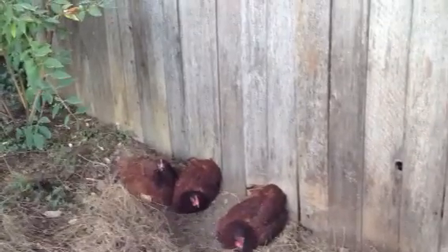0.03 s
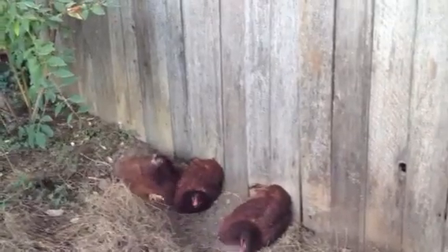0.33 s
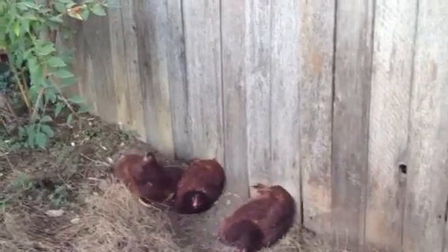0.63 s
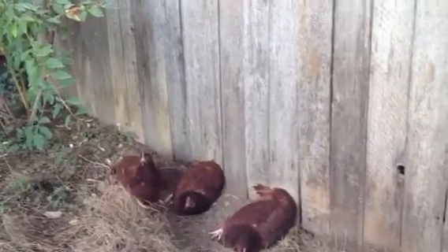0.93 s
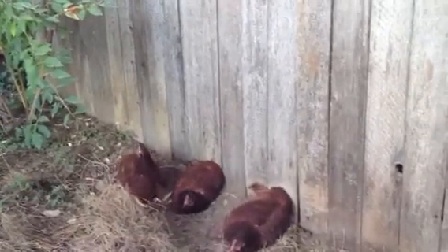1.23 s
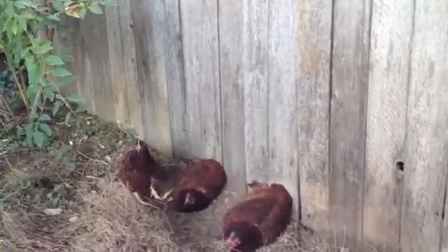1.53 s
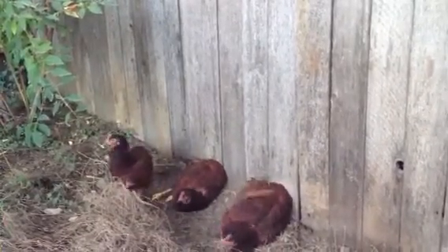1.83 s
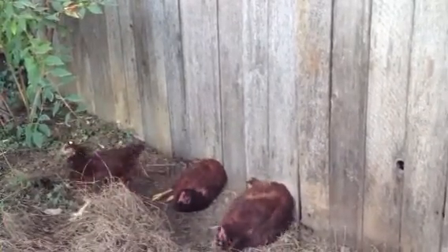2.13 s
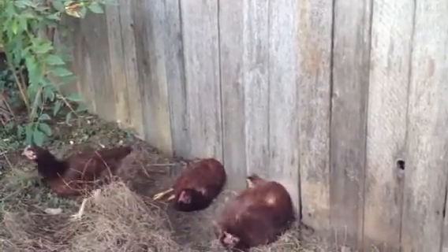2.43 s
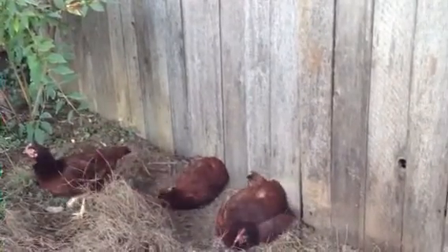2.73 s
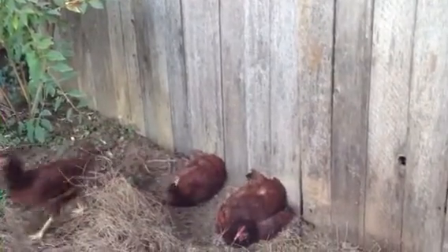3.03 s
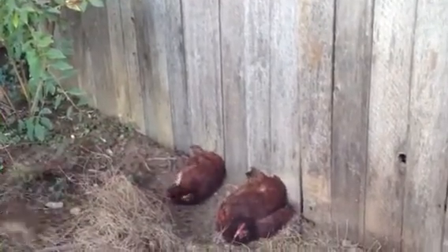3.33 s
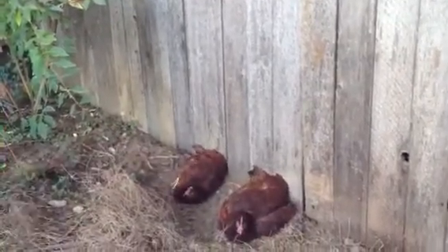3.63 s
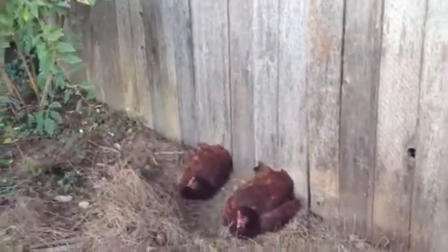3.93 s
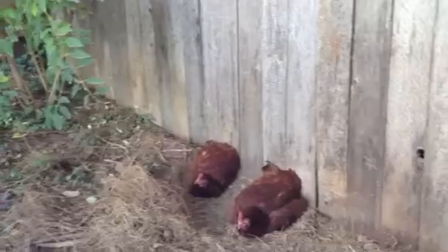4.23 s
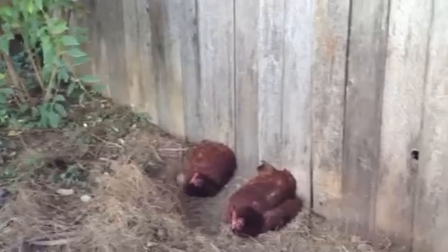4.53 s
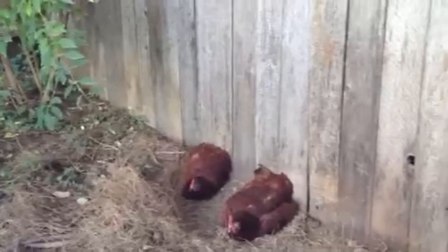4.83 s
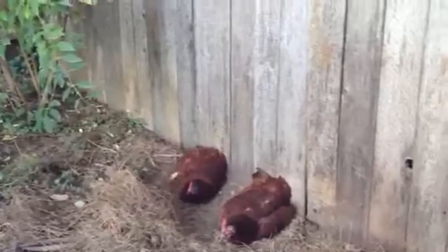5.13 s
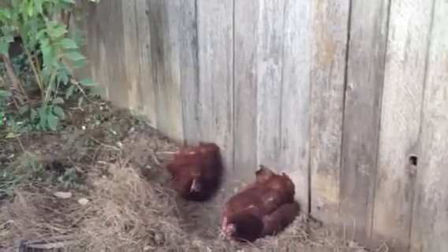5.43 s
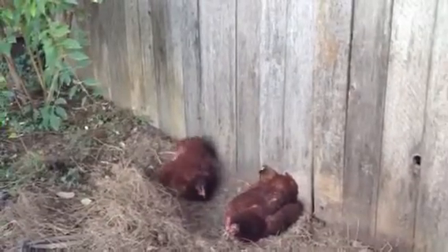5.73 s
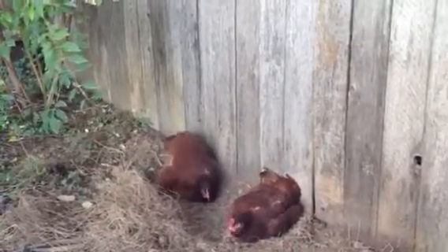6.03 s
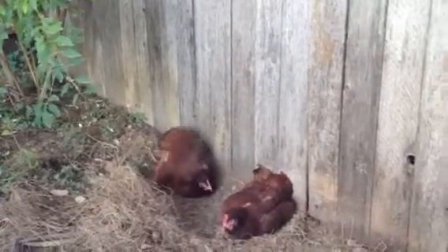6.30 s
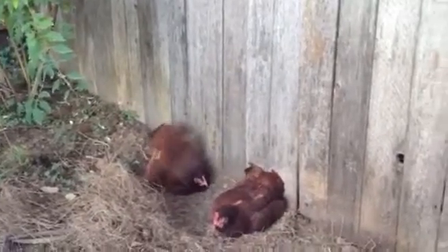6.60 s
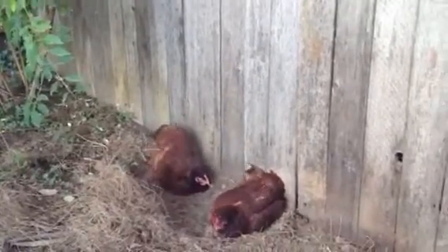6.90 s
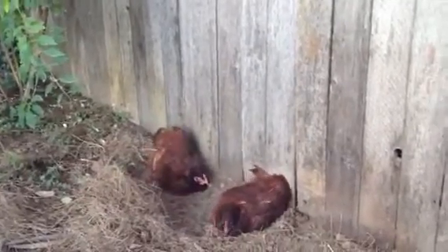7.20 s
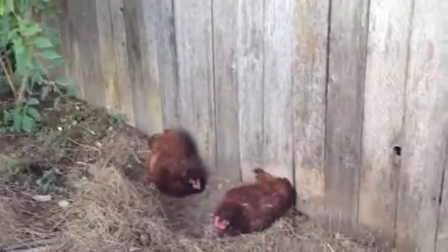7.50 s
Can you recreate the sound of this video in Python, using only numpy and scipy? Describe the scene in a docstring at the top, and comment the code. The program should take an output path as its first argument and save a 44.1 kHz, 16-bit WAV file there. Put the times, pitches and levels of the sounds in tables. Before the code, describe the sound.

Crisp, hissing scrapes on the microphone stand out over soft hen clucks and light straw scratching in a quiet yard.

```python
"""Hens cluck and croon softly as they dust-bathe by a plank fence; one walks off through the straw.
Each call is a harmonic source shaped by throat and chest resonances. Feet and wings crush straw and
earth in clusters of tiny impacts, and the fence returns a short echo. Something dry brushes the
microphone casing: stick-slip friction gives light crackles, snaps and two hard sweeps that ring its
cavities. Behind the hush of the quiet yard a far engine drones faintly."""
import sys
import numpy as np
from scipy import signal
from scipy.fft import rfft, irfft
from scipy.io import wavfile
from scipy.ndimage import uniform_filter1d

SR = 44100
rng = np.random.default_rng(int(sys.argv[2]) if len(sys.argv) > 2 else 0)


def bounce(signal):
    """Save signal as a 16-bit WAV file at the path given by the first command-line argument."""
    frames = np.transpose(np.atleast_2d(signal))
    limited = np.clip(frames, -1, 1)
    pcm = np.round(limited * 32767).astype(np.int16)
    wavfile.write(sys.argv[1], SR, pcm)


N = 333396
TIME = np.arange(N) / SR

# Levels are nominal, before filters and gains; a share is relative to the level in its row.
# (time [s], length [s], level [dB], start pitch [Hz], end pitch [Hz], throat [Hz], chest share [dB])
CLUCK_NOTES = [(-.008, .034, -48, 260, 302, 996, -5.5), (.022, .025, -49.5, 316, 328, 980, -1.5),
               (.196, .019, -48.5, 282, 276, 900, -2), (.212, .021, -45.5, 288, 252, 960, -12),
               (3.374, .017, -43.5, 428, 400, 420, -4), (3.391, .014, -52, 405, 385, 420, -10),
               (3.439, .046, -55.5, 406, 390, 417, -10), (5.857, .01, -48, 380, 372, 750, -20),
               (5.874, .023, -34.5, 478, 406, 930, -15), (5.894, .014, -41.5, 388, 346, 720, -24),
               (5.914, .021, -41, 370, 336, 700, -36)]
# (time [s], length [s], level [dB], start pitch [Hz], end pitch [Hz], throat [Hz])
CROON_NOTES = [(.3, .085, -58, 256, 256, 570), (6.735, .067, -58.5, 260, 270, 630),
               (6.931, .06, -54, 268, 266, 583), (7.014, .13, -55, 238, 244, 546),
               (7.246, .11, -55, 224, 262, 530), (7.293, .085, -54, 258, 224, 700),
               (7.43, .125, -55.5, 214, 240, 520)]
HUSH_SPECTRUM = [(30, -32.5), (60, -24), (95, -15), (125, -4.5), (170, -2.5), (240, -5), (330, -3),
                 (680, -5), (1030, -6.5), (1500, -12.5), (2310, -18), (4650, -25), (9640, -24.5),
                 (15000, -22.5)]  # outdoor background (frequency [Hz], relative gain [dB])
HUSH_LEVELS = [(0.0, -60), (0.69, -59), (1.29, -61), (1.83, -59), (2.43, -60), (3.25, -59), (3.86, -56),
               (4.96, -60), (5.9, -59), (6.05, -58), (6.7, -58)]  # its slow course (time [s], level [dB])
ENGINE_HUM = [(0.0, 78.8, -87), (0.34, 74.3, -91), (0.48, 59.2, -80), (1.43, 61.1, -84), (1.52, 54.5, -82),
              (3.26, 75.4, -72), (5.16, 74.3, -81), (5.73, 66.3, -76), (7.56, 72.7, -77)]  # deep tone (time [s], frequency [Hz], level [dB])
ENGINE_TONES = [(527.6, -72.5), (656.8, -74), (1061, -80.5)]  # higher tones (frequency [Hz], level [dB])
LIGHT_TOUCHES = [(.06, .18, -62), (.305, .05, -62.5), (.48, .18, -63.5), (.72, .2, -71), (2.76, .13, -62),
                 (2.91, .33, -59), (3.6, .23, -58)]  # brushing on the casing (time [s], hold [s], level [dB])
# friction spectra: bright casing, duller scrape, fine and coarse hiss (frequency [Hz], relative gain [dB])
CASING_SPECTRUM = [(1500, -70), (4200, -13.5), (6900, -17.5), (7800, 2.5), (8800, -1), (10000, 0),
                   (11300, 2.5), (12200, 3.5), (13000, 0), (15300, -2)]
SCRAPE_SPECTRUM = [(200, -33), (800, -10.5), (1500, -3), (2500, 0.5), (4000, 4), (4700, 3.5), (6000, 6.5),
                   (7200, 8.5), (9500, 6.5), (15000, -6)]
FINE_SPECTRUM = [(1500, -55), (3000, -42), (7000, -35), (9500, -18), (11100, -2), (12200, -0.5),
                 (13200, -4), (15100, -6)]
COARSE_SPECTRUM = [(1500, -45), (3000, -32), (6900, -23), (7800, 1.5), (8700, -1.5), (10000, -0.5),
                   (11000, -2.5), (12500, -20.5)]
# clicks on the casing (time [s], level [dB], dull share [dB], 60 dB chatter decay [s])
FIBRE_SNAPS = [(.234, -50, -28, .006), (.3074, -52.5, -17, .02), (.5298, -53.5, -18, .01),
               (.8358, -39, -11, .0043), (.9353, -48, -12, .017), (1.0785, -57, -18, .015),
               (1.9926, -55, -20, .006), (2.0149, -58, -14, .01), (2.0305, -58, -18, .008),
               (2.0728, -57, -16, .006), (2.8251, -52, -15, .006), (2.865, -33, -12, .017),
               (2.939, -53, -18, .004), (3.2506, -40.5, -17, .005), (3.9435, -25, -20, .02),
               (3.959, -24, -28, .017), (3.971, -23, -27, .02), (3.976, -20, -32, .056),
               (4.059, -28, -8, .02), (4.159, -31, -11, .059), (4.378, -34, -12, .04),
               (4.6958, -54, -20, .0086), (4.7404, -58, -14, .01), (4.9599, -55, -14, .025),
               (6.5365, -47, -.5, .03), (6.6807, -25.5, -9, .0095), (6.9876, -54, -4.5, .0068),
               (7.539, -50, -4.5, .006)]
# feet and wings in straw (time [s], length [s], level [dB], chaff share [dB], earth share [dB])
STRAW_SCRATCHES = [(1.095, .018, -69, -12, -15), (1.654, .06, -65, -12, -15), (1.784, .028, -55.5, -20, 4),
                   (1.935, .005, -63, -1, -15), (2.015, .039, -68, -6, 9), (2.146, .024, -63, -3, -15),
                   (2.224, .019, -68, 0, -15), (2.864, .008, -53, -10, -15), (3.324, .058, -54.5, 0, -15),
                   (3.578, .028, -55.5, 1, -12), (3.735, .03, -53, 5, -3), (4.35, .17, -58, -10, -14),
                   (5.283, .011, -64, 3, -12), (5.343, .008, -64, 4, -12), (5.368, .009, -62, 0, -12),
                   (5.828, .032, -64, -10, -6), (6.39, .08, -64, -10, -6), (6.74, .04, -63, -15, -6),
                   (6.815, .016, -62.5, -15, -6), (6.893, .028, -59.5, -15, 4)]
STALK_CRACKS = [(1.097, -66, 4500), (1.349, -62, 5600), (1.421, -65, 3770), (1.6, -63, 4600),
                (1.786, -53, 2300), (1.934, -64, 3700), (2.292, -53.5, 3520), (2.293, -56, 10400),
                (2.863, -53, 3320), (3.46, -59, 3180), (3.801, -47.5, 9700), (3.809, -55, 9500),
                (4.056, -31, 8200)]  # single stalks (time [s], level [dB], centre [Hz])
# firm strokes on the casing (time [s], hold [s], 20 dB rise [s], 20 dB fall [s], fine hiss level [dB],
# coarse hiss share [dB], scrape share [dB], cavity share [dB])
FIRM_STROKES = [(3.75, .11, .25, .03, -67, -6, 6, -5), (3.885, .05, .045, .03, -38.5, -10, -10, -16),
                (3.942, .036, .014, .025, -21, -10, -21, -21),
                (3.985, .07, .02, .11, -27.5, -14, -12.5, -26), (4.09, .038, .03, .025, -39, -8, -15, -14),
                (4.17, .06, .02, .05, -41, -9, -20, -15), (4.225, .012, .02, .17, -37.5, -10, -15, -21),
                (4.372, .022, .19, .06, -31, -8, -7.5, -22), (4.44, .06, .05, .19, -49.5, -2.5, -3.5, -5),
                (4.62, .03, .05, .08, -62.5, -3, -7, -15), (5.85, .06, .1, .3, -60.5, -6, -4, -9),
                (6.055, .065, .08, .05, -59, -2.5, -4, -3), (6.165, .055, .07, .14, -36.5, -1, -6.5, -13.5),
                (6.232, .082, .05, .085, -33, -5.5, -10.5, -25), (6.36, .025, .05, .21, -48.5, -9, -6, -14),
                (6.54, .03, .14, .1, -57.5, -3, -2, -7), (6.6, .05, .08, .05, -55.5, -2, -2.5, -.5),
                (6.684, .025, .008, .15, -53.5, -3.5, -2, -.5), (6.88, .03, .07, .045, -61.5, -2.5, -3, -7),
                (7.12, .09, .07, .33, -64.5, -2, -1, -3), (7.375, .03, .25, .12, -62, 1, 3, -3),
                (7.49, .07, .08, .1, -66, -1, -2, -7)]
# bumps under the first sweep (time [s], length [s], level [dB], centre [Hz], bandwidth [Hz])
SOFT_BUMPS = [(3.975, 0.037, -51.5, 180, 160), (4.048, 0.028, -51, 219, 298),
              (4.064, 0.013, -51, 600, 1200), (4.073, .02, -49, 214, 247)]


def undb(db):
    """Amplitude ratio: tenfold for every 20 dB."""
    return 10 ** (np.asarray(db) / 20)


def unit(x):
    """Normalisation to rms 1."""
    return x / np.sqrt(np.mean(x ** 2) + 1e-30)


def add(out, s, x):
    """Superposition: x adds to out from time s."""
    i = int(round(s * SR))
    x, i = x[max(-i, 0):], max(i, 0)
    out[i:i + len(x)] += x[:max(len(out) - i, 0)]


def resonance(x, hz, width_hz):
    """A damped resonator, whose Q is frequency over bandwidth."""
    return signal.lfilter(*signal.iirpeak(min(hz, .45 * SR), hz / width_hz, fs=SR), x)


def bandpass(x, hz, width_hz):
    """Band-pass filtering about hz, the geometric mean of the band edges."""
    low = np.hypot(hz, width_hz / 2) - width_hz / 2
    edges = [low, min(low + width_hz, .45 * SR)]
    return signal.sosfilt(signal.butter(2, edges, "band", fs=SR, output="sos"), x)


def colour(x, spectrum, size=512):
    """Minimum-phase filtering to a spectral outline; white noise keeps its power."""
    hz, db = np.transpose(spectrum)
    bin_hz = np.arange(size + 1) * SR / (2 * size)
    gain = unit(undb(np.interp(np.log(bin_hz + 1), np.log(hz), db)))
    cepstrum = irfft(np.log(gain))
    cepstrum[1:size] *= 2  # folding the cepstrum makes the filter causal
    cepstrum[size + 1:] = 0
    return signal.oaconvolve(x, irfft(np.exp(rfft(cepstrum))))[:len(x)]


def wander(rate):
    """Random modulation of rms 1, gliding to a new value rate times a second."""
    step = int(SR / rate)
    held = np.repeat(rng.standard_normal(N // step + 2), step)
    return unit(uniform_filter1d(held, step)[:N])


def grains(count, rate, spread_db):
    """Shot noise: about rate impulses a second, most weak and a few strong."""
    size = undb(spread_db * np.minimum(rng.exponential(size=count), 5))
    return unit((rng.random(count) < rate / SR) * size * rng.choice([-1, 1], count))


def bursts(rows, rate, spread_db, fade, rise=.1):
    """Granular crushing: each contact is band-limited shot noise that swells fast and dies away."""
    out = np.zeros(N)
    for s, length, db, hz, width_hz in rows:
        count = int(2 * length * SR)
        u = TIME[:count] / length
        crush = grains(count, rate, spread_db) * (1 - np.exp(-u / rise)) * np.exp(-fade * u ** 2)
        add(out, s, undb(db) * unit(bandpass(crush, hz, width_hz)) / np.sqrt(2))
    return out


def hens(jitter=.066, shimmer_db=4, rasp=.87, chest_hz=300, edge_hz=2700):
    """Source and filter: harmonics of a gliding pitch pass throat, chest and faint high resonances."""
    out, waver, tremor = np.zeros(N), wander(150), wander(110)
    harmonics = np.arange(1, 15)[:, None]
    notes = [(*row, .2, 0) for row in CLUCK_NOTES]
    notes += [(*row, -25, .5, .04) for row in CROON_NOTES]  # little chest, rougher, arching in pitch
    for s, length, db, start, end, throat_hz, chest_db, rough, arch in notes:
        u = np.linspace(0, 1, int(length * SR))
        now = (int(s * SR) + np.arange(len(u))) % N
        middle = (1 + arch) * (start + end) / 2
        pitch = np.polyval(np.polyfit([0, .5, 1], [start, middle, end], 2), u)
        hz = harmonics * pitch * (1 + jitter * rough * waver[now])
        source = np.exp(2j * np.pi * np.cumsum(hz, axis=1) / SR)
        throat = 1 / (1 + 1j * (hz - throat_hz * pitch / middle) / 232.5) ** 4  # moves with the pitch
        chest = undb(chest_db) / (1 + 1j * (hz - chest_hz) / 380) ** 2
        edge = undb(db + 7) / (1 + 1j * (hz - edge_hz) / 700) ** 2  # a louder note is brighter
        voice = unit(np.sum((throat + chest + edge) * source, axis=0).real)
        breath = rasp * rough * unit(bandpass(rng.standard_normal(len(u)), throat_hz, 710))
        envelope = undb(shimmer_db * rough * tremor[now]) * np.abs(np.sin(np.pi * u)) ** .37
        add(out, s, undb(db) * unit((voice + breath) * envelope))
    return out


def fence(x, echo_db=-18, t60=.13, delay_s=.006):
    """Scattering: planks and bushes add a short, dull echo to the direct sound."""
    t = TIME[:SR // 3]
    tail = resonance(rng.standard_normal(len(t)), 1200, 3300) * undb(-60 * t / t60) * (t > delay_s)
    tail /= np.sqrt(np.sum(tail ** 2))
    return x + undb(echo_db) * signal.oaconvolve(x, tail)[:N]


def yard_hush(gain_db=.5, flicker_db=.8):
    """Ambient noise: a broad spectrum, strongest in the bass, whose level drifts and flickers."""
    air = unit(colour(rng.standard_normal(N), HUSH_SPECTRUM, size=4096))
    level_db = np.interp(TIME, *np.transpose(HUSH_LEVELS))
    return air * undb(level_db + gain_db + flicker_db * wander(6))


def far_engine(hum_db=1.5, rumble_db=5, waver_db=2.5, drift_hz=1.557):
    """Tones plus band noise: a deep hum and a rumble swell together under a wavering drone."""
    times, hum_hz, levels = np.transpose(ENGINE_HUM)
    hum = undb(hum_db) * tone(np.interp(TIME, times, hum_hz))
    rumble = undb(rumble_db) * unit(bandpass(rng.standard_normal(N), 170, 85))
    drone = sum(undb(db + waver_db * wander(2.15)) * tone(hz + drift_hz * wander(5))
                for hz, db in ENGINE_TONES)
    return (hum + rumble) * undb(np.interp(TIME, times, levels)) + drone


def tone(hz):
    """A sinusoid of rms 1, whose phase is the integral of its frequency."""
    return np.sqrt(2) * np.sin(2 * np.pi * np.cumsum(hz) / SR)


def press(s, hold, rise, fall):
    """Exponential envelope of a contact force: 20 dB up per rise time, a hold, 20 dB down per fall time."""
    decades = np.maximum(s - TIME, 0) / rise + np.maximum(TIME - s - hold, 0) / fall
    return undb(-20 * decades.clip(0, 10))


def cavity(x, hz=3260, width_hz=620):
    """Cavity resonance: the hollow behind the microphone port rings at one pitch."""
    ring = resonance(resonance(x, hz, width_hz), hz, width_hz)
    return ring * np.sqrt(2 * SR / (np.pi * width_hz))  # white noise keeps its power


def touches(ring_db=-14.5, scrape_db=-17, flutter_db=1.5, catch_db=-12):
    """Stick-slip friction under light load: single fibres catch and let go, so the hiss crackles."""
    power = sum((undb(db) * press(s, hold, rise=.09, fall=.09)) ** 2 for s, hold, db in LIGHT_TOUCHES)
    slips = grains(N, rate=2600, spread_db=4) + undb(catch_db) * grains(N, rate=60, spread_db=1.5)
    slips *= np.sqrt(power) * undb(flutter_db * wander(70))
    scrape = undb(scrape_db) * colour(slips, SCRAPE_SPECTRUM)
    return colour(slips, CASING_SPECTRUM) + undb(ring_db) * cavity(slips) + scrape


def snaps(chatter_db=-17, energy_span_s=.004):
    """Impulse excitation: a fibre lets go with a click and chatters briefly against the casing."""
    bright, dull = np.zeros(N), np.zeros(N)
    t = TIME[:SR // 20]
    for s, db, dull_db, t60 in FIBRE_SNAPS:
        click = undb(chatter_db - 60 * t / t60) * rng.standard_normal(len(t))
        click[0] += 1
        click *= undb(db) * np.sqrt(energy_span_s * SR / np.sum(click ** 2))
        add(bright, s, click)
        add(dull, s, click * undb(dull_db))
    return colour(bright, CASING_SPECTRUM) + colour(dull, SCRAPE_SPECTRUM)


def straw_ticks(count=26):
    """A random point process: now and then a straw ticks under the hens, each at its own pitch."""
    rows = [(when * N / SR, .008, -80 + 14 * strength, 2200 + 3000 * pitch, 1500)
            for when, strength, pitch in rng.random((count, 3))]
    return bursts(rows, rate=5000, spread_db=4, fade=1.6)


def scratches(straw=(2000, 2600), chaff=(11400, 4200), earth=(520, 480)):
    """Crushing and fracture: each material sounds in its own band (centre [Hz], bandwidth [Hz])."""
    rows = [(s, length, db + share_db, *material) for s, length, db, chaff_db, earth_db in STRAW_SCRATCHES
            for share_db, material in [(0, straw), (chaff_db, chaff), (earth_db, earth)]]
    rows += [(s, .006, db, hz, .22 * hz) for s, db, hz in STALK_CRACKS]  # brief and narrow in band
    return bursts(rows, rate=4000, spread_db=4, fade=1, rise=.12)


def sweeps(judder_db=1, sway_db=1.1):
    """Sliding friction under firm load: slips crowd into a juddering hiss with a duller scrape."""
    power = 0
    for s, hold, rise, fall, db, *shares_db in FIRM_STROKES:
        gains = undb(db + np.array([0, *shares_db]))
        power += (gains[:, None] * press(s, hold, rise, fall)) ** 2
    judder = undb(judder_db * wander(220) + sway_db * wander(45))
    fine_force, coarse_force, scrape_force, ring_force = np.sqrt(power) * judder
    fine = colour(fine_force * grains(N, rate=7500, spread_db=3.5), FINE_SPECTRUM)
    coarse = colour(coarse_force * grains(N, rate=14000, spread_db=3.5), COARSE_SPECTRUM)
    scrape = colour(scrape_force * grains(N, rate=12000, spread_db=1.5), SCRAPE_SPECTRUM)
    ring = cavity(ring_force * grains(N, rate=8700, spread_db=5))
    return fine + coarse + scrape + ring


def bumps():
    """Soft impacts on the casing put their energy at low frequencies."""
    return bursts(SOFT_BUMPS, rate=1400, spread_db=3, fade=1.3)


def scene():
    """Superposition in one channel: hens and straw with their echo, close brushing, yard and engine."""
    birds = fence(hens() + straw_ticks() + scratches())
    brushing = touches() + sweeps() + snaps() + bumps()
    return (birds + brushing + yard_hush() + far_engine())[None]


def record(dry, low_hz=45, top_hz=15400):
    """Band limiting: the deep bass rolls off gently and the top is cut steeply."""
    dry = signal.sosfilt(signal.butter(2, low_hz, "high", fs=SR, output="sos"), dry)
    return signal.sosfilt(signal.ellip(10, .2, 70, top_hz, fs=SR, output="sos"), dry)


dry = scene()
out = record(dry)
bounce(out)
```